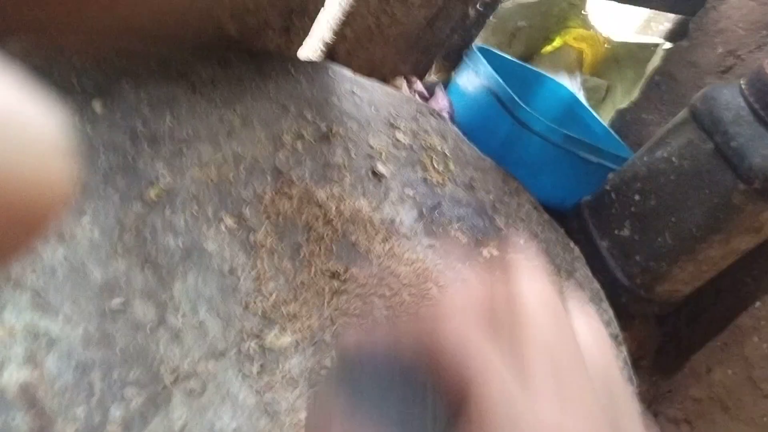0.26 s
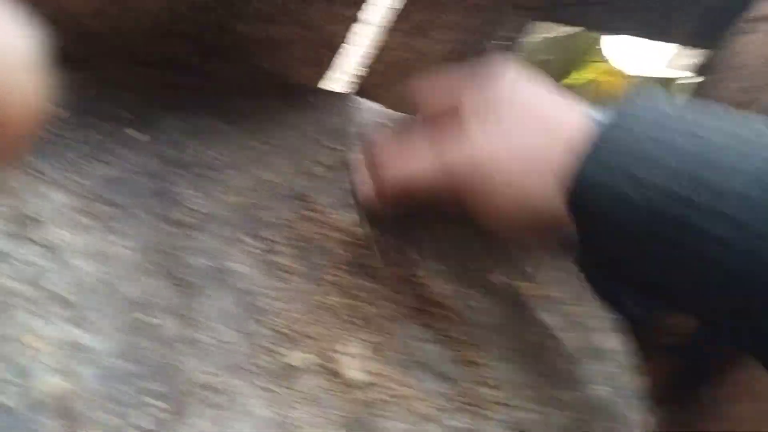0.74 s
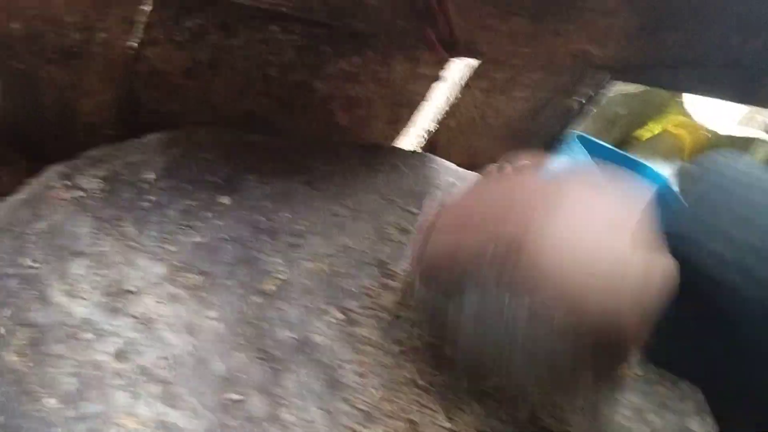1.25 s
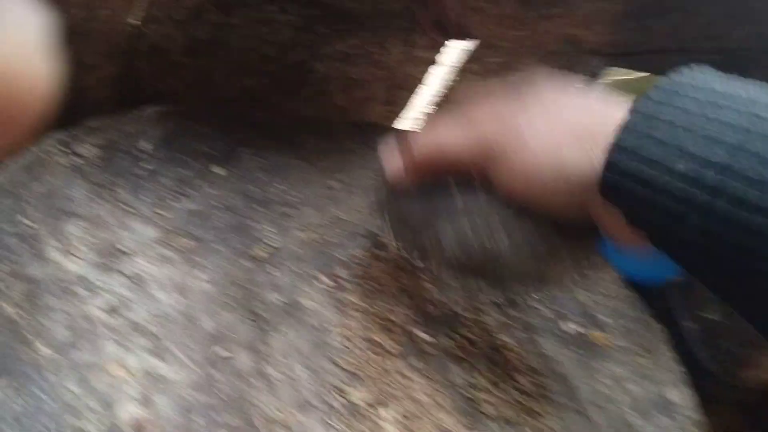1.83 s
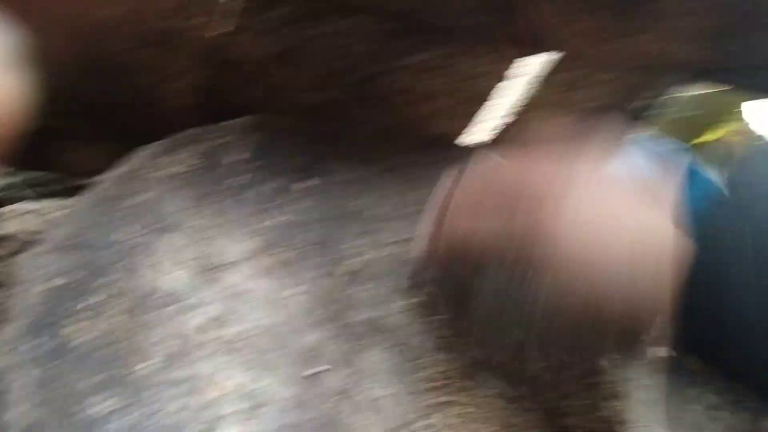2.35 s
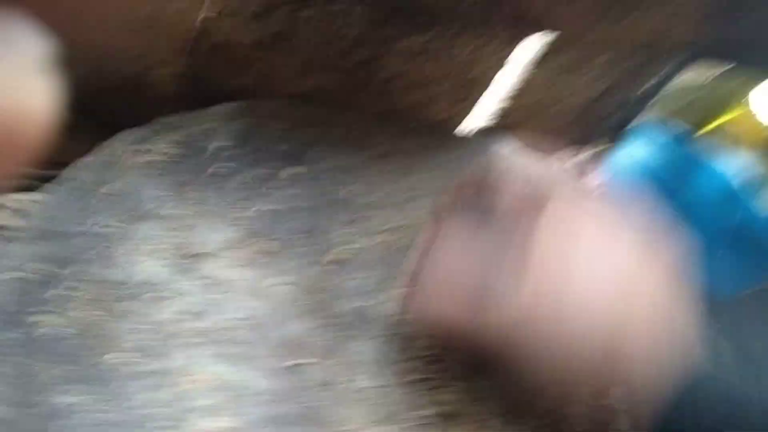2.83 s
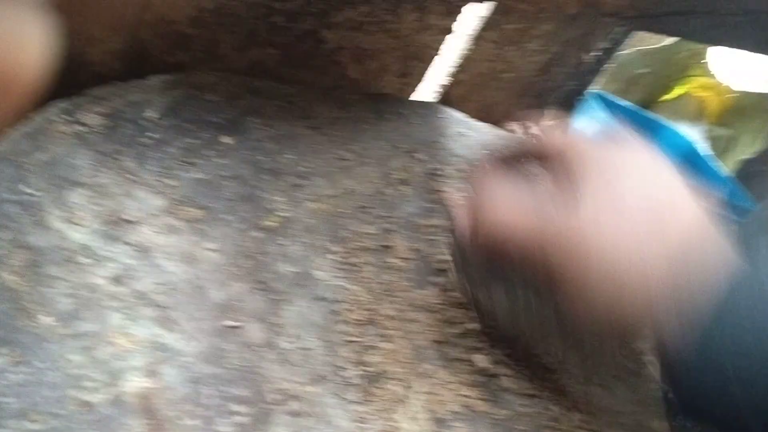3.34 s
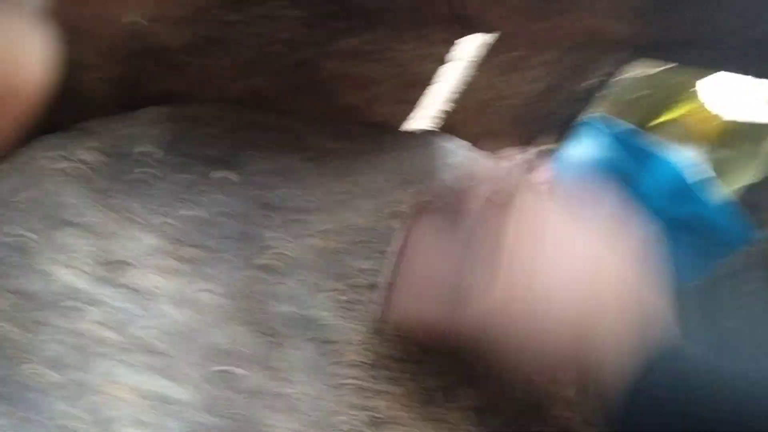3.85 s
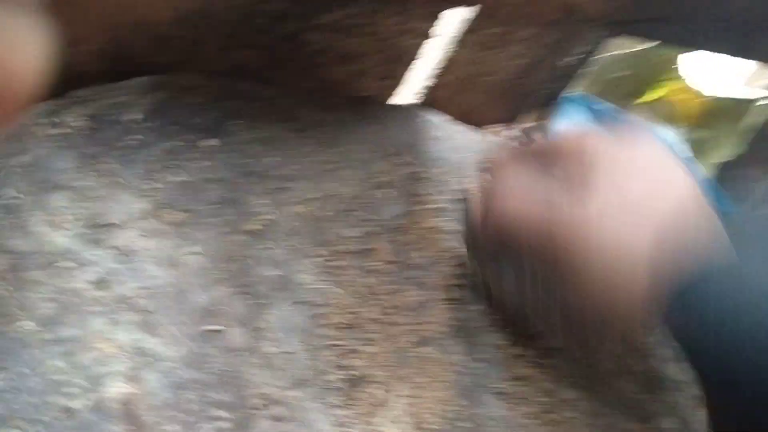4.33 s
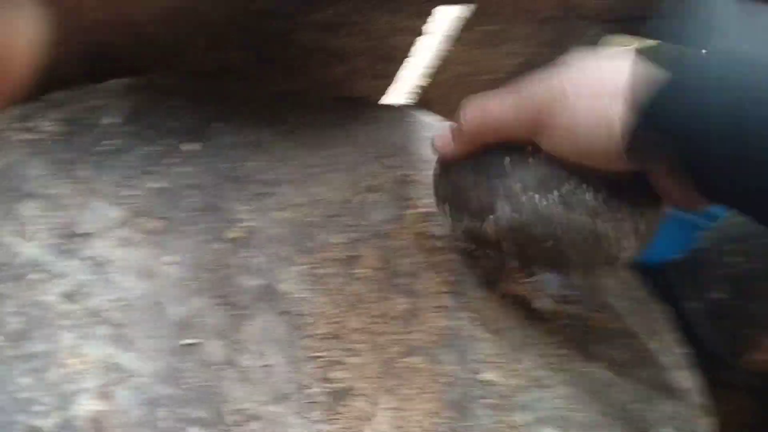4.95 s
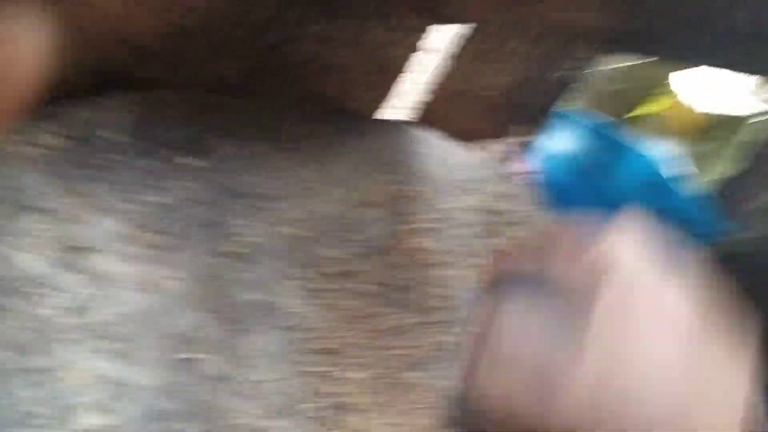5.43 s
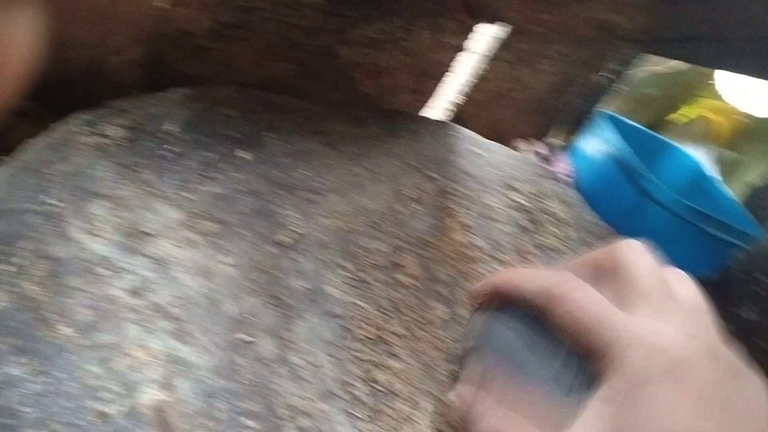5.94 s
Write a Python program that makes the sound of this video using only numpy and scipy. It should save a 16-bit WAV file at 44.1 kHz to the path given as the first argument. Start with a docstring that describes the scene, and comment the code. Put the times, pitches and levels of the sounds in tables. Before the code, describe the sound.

A hand stone is pushed back and forth over damp spice on a heavy stone slab. The short, uneven strokes make a gritty grinding with a crumbly hiss and a low rumble underneath. Stone knocks on stone at irregular moments, some as light taps and others as sharper clacks with a brief ring. It is heard from close by in a small, quiet kitchen.

```python
"""A hand stone grinds damp spice on a stone slab, heard from close by in a small kitchen.
Friction drives the sound: in each short stroke, breaking grit excites the damped modes of both stones
and dragged crumbs hiss. Impacts of stone on slab add knocks, duller when the contact is softer.
The heavy slab rumbles on its seat, and near walls reflect the strokes and knocks over a faint noise."""
import sys
import numpy as np
from scipy import signal
from scipy.fft import rfft, irfft, next_fast_len
from scipy.io import wavfile
from scipy.ndimage import uniform_filter1d, map_coordinates

SR = 44100
rng = np.random.default_rng(int(sys.argv[2]) if len(sys.argv) > 2 else 0)


def dump_mix(stems):
    """Bounce the given channels to the path in sys.argv[1] as a 16-bit WAV at rate SR."""
    frames = np.atleast_2d(stems).T  # one column per channel
    limited = np.clip(frames, -1, 1)  # hard clip at full scale
    pcm = np.round(limited * 32767).astype(np.int16)
    wavfile.write(sys.argv[1], SR, pcm)


N = 272566

# impacts of stone on slab: start_s, level_db, hardness_hz, thud_db, ring_db, ring_hz
KNOCKS = [(0.161, -36.5, 1300, -9, -3, 1152), (0.3672, -45, 1520, 9, 6, 1200),
          (0.4203, -36.5, 1480, -9, -15, 1220), (0.6759, -38.5, 900, 30, 6, 1096),
          (1.0067, -17, 890, -8.5, -3, 1048), (1.096, -41, 1700, 0.5, 5, 1120),
          (1.1208, -39.5, 1970, 11, -11, 1070), (1.312, -41.5, 800, 15, -3, 1097),
          (1.5055, -33, 1190, 5, 16.5, 1135), (1.7632, -35.5, 1270, 3, 7.5, 1124),
          (1.811, -47, 1490, -6, 20.5, 1190), (1.965, -53.5, 3260, -9, -12.5, 1180),
          (2.1071, -16.5, 930, 2, 8, 1060), (2.1859, -26.5, 1425, 3, 2, 1070),
          (2.2016, -20, 1820, 6, 5.5, 1055), (3.4854, -22, 710, 6, 13, 1075),
          (3.9114, -21.5, 1406, 1.5, 10, 1025), (4.1834, -30, 1490, 1, 8, 1178),
          (4.2621, -38.5, 2150, 4.5, 7, 1084), (4.4746, -17, 877, -6, -6.5, 1050),
          (5.01, -26.5, 1400.0, 10.5, 9, 1087), (5.2017, -16, 730, -0.5, 1.5, 1060),
          (5.2982, -31.5, 340, 20, -4, 1085), (5.378, -43, 1050, 0.5, 5, 1059),
          (5.9192, -16, 1670, -11.5, -15.5, 930)]
# modes of the slab: pitch_hz, width_hz, level_db
SLAB_MODES = [(396, 312, -0.5), (499, 212.4, 3.5)]
HISSES, GRINDS, SCRAPES, RUMBLES = range(4)  # the level columns of a stroke


def grinding():
    """Forced vibration: grit breaks in bunches, and the same force drives the modes of both stones."""
    # modes of the hand stone: pitch_hz, width_hz, level_db
    stone_modes = [(1104, 36, 7.5), (1354, 190, -7.5), (2390, 410, -15.5)]
    # a looser grip lets the hand stone ring: time_s, ring_db
    grip = [(.5, 0.5), (.8, 4.5), (1.1, 3), (1.55, 2), (2.0, 3.5), (2.6, 0), (3.0, -2), (3.65, 1),
            (4.0, -7), (4.25, -1), (4.6, -3.5), (5.0, -4.5), (5.4, 0), (5.75, 0.5), (6.18, -9.5)]
    force = grit(rate_hz=570, spread_db=1.5) * amp(2.5 * wobble(70))
    slab = unit(filtered(force, lambda hz: resonate(SLAB_MODES, hz) * band(hz, 120, 460, steep=2.2)))
    slab = steadied(slab, span_s=0.036, share=0.98)
    stone = unit(filtered(force, lambda hz: resonate(stone_modes, hz) * band(hz, 850, 4000, steep=2.9)))
    stone = level(grip) * amp(-0.5) * steadied(stone, span_s=0.063, share=0.9)
    crumbs = amp(-20.5) * unit(filtered(force, lambda hz: band(hz, 170, 1500, steep=1.9)))
    envelope = bite(strokes(GRINDS, dip_db=23.5), span_s=0.0079, share=0.22)
    return amp(-1.37) * envelope * steadied(slab + stone + crumbs, span_s=0.08, share=0.58)


def spice():
    """Friction noise: dragged crumbs merge into a clumpy hiss, with single husks snapping."""
    # spectrum of the hiss: frequency_hz, density_db
    spectrum = [(300, -33.5), (1500, -6.5), (2800, -4), (3600, -3.5), (4400, 0.5), (5300, -1), (7000, 0),
                (8700, 2), (11500, -0.5), (13500, -4), (15800, -7.5)]
    clumps = amp(0.31 * wobble(170) + 2.0 * wobble(45))
    husks = amp(-14) * grit(rate_hz=230, spread_db=-4.0)
    sides = [clumps * grit(rate_hz=16000, spread_db=5) + husks for _ in range(2)]
    for i in range(2):  # the hand and the slab each send back a copy
        sides[i] = reflection(sides[i], delay_s=0.000702, swing=0.093, gain=0.52)
        sides[i] = reflection(sides[i], delay_s=0.002, swing=.04, gain=0.84)
    hiss = unit(filtered(np.array(sides), lambda hz: amp(along(spectrum, hz))))
    # a faster stroke is brighter as well as louder
    speed = bite(strokes(HISSES, dip_db=17), span_s=0.0086, share=0.11)
    treble = filtered(hiss, lambda hz: band(hz, 4900, SR, steep=0.67))
    return amp(1.2) * speed * (hiss + treble * (unit(speed) ** 0.084 - 1))


def skimming():
    """Resonance: light sliding excites the upper modes of the hand stone."""
    # upper modes: pitch_hz, width_hz, level_db
    modes = [(1793, 70, -1), (2255, 50, -5), (2797, 71, -12.5), (3480, 50, -14)]
    force = grit(rate_hz=2500, spread_db=5.0)
    scrape = filtered(force, lambda hz: resonate(modes, hz) * band(hz, 1700, 3000, steep=1.9))
    return amp(-2.0) * strokes(SCRAPES, dip_db=19) * steadied(scrape, span_s=0.09, share=0.23)


def strokes(column, dip_db, lag_s=0):
    """Incoherent powers add: the gain of all strokes, each dip_db below its peak at the turns."""
    # pushes and pulls: fastest_s, rise_s, fall_s, pressure_lag_s, hiss_db, grind_db, scrape_db, rumble_db
    movements = [(0.07, 0.096, 0.092, 0.023, -55.5, -50.0, -58.5, -49),
                 (0.187, 0.037, 0.092, -0.011, -49.5, -41.5, -49.5, -53.5),
                 (0.333, 0.051, 0.108, -0.0021, -57.5, -60, -56, -56),
                 (0.391, 0.017, 0.11, -0.017, -61.5, -45, -55, -43),
                 (0.507, 0.05, 0.089, -0.024, -51.0, -39.5, -52, -50),
                 (0.66, 0.072, 0.1, -0.0089, -58, -57, -57.5, -58.0),
                 (0.686, 0.012, 0.037, -0.004, -66.5, -40.5, -65, -45.5),
                 (0.773, 0.026, 0.078, -0.01, -64, -48.5, -66, -53.5),
                 (1.112, 0.034, 0.042, -0.0035, -53.5, -36.5, -42, -53.0),
                 (1.172, 0.078, 0.035, 0.0068, -45, -55.5, -54.5, -53.5),
                 (1.261, 0.043, 0.1, 0.01, -50.5, -51, -53.5, -56.5),
                 (1.415, 0.041, 0.024, 0.004, -69, -50, -52.5, -65),
                 (1.469, 0.043, 0.056, 0.0033, -54, -54.5, -53, -49.5),
                 (1.563, 0.031, 0.084, -0.019, -49.5, -45, -52.5, -50),
                 (1.718, 0.11, 0.087, 0.036, -55.5, -58.5, -56.5, -53),
                 (1.84, 0.025, 0.09, -0.024, -53.5, -45, -54, -50),
                 (2.124, 0.13, 0.11, 0.045, -71, -55, -49, -56.0),
                 (2.238, 0.059, 0.065, 0.011, -48.5, -56, -50.5, -53.5),
                 (2.372, 0.068, 0.053, 0.0033, -48, -49, -51.0, -56.5),
                 (2.472, 0.043, 0.069, 0.014, -67, -52.5, -54, -72.5),
                 (2.532, 0.023, 0.131, 0.0032, -53, -57, -53.5, -59.5),
                 (2.672, 0.074, 0.073, 0.007, -50.0, -50.5, -46, -54.0),
                 (2.853, 0.088, 0.053, 0.014, -54, -53.0, -56, -50.5),
                 (2.961, 0.039, 0.071, 0.0015, -48, -46, -49, -55.5),
                 (3.09, 0.031, 0.03, 0.0, -61, -66.0, -51, -75.0),
                 (3.138, 0.094, 0.048, 0.0095, -56.5, -53, -62, -53.5),
                 (3.243, 0.052, 0.059, 0.0039, -56.5, -48, -58.0, -55.0),
                 (3.291, 0.042, 0.096, -0.045, -68.0, -67, -59.5, -54),
                 (3.566, 0.067, 0.148, -0.014, -56, -51, -59, -49.5),
                 (3.686, 0.036, 0.083, -0.016, -49.5, -47.5, -56.0, -54.5),
                 (3.876, 0.083, 0.067, 0.027, -57.5, -54.5, -60.5, -55.5),
                 (3.992, 0.069, 0.073, -0.00087, -53.5, -43, -49.5, -67),
                 (4.167, 0.079, 0.048, 0.0054, -56.5, -46.5, -54, -57.0),
                 (4.249, 0.049, 0.084, -0.0097, -62.5, -46, -58, -54.5),
                 (4.573, 0.071, 0.046, -0.0073, -53, -42.5, -58.5, -46),
                 (4.704, 0.104, 0.048, -0.004, -52, -43.5, -62.5, -61),
                 (4.871, 0.1, 0.031, 0.0084, -56.5, -47.5, -59, -52.5),
                 (4.975, 0.075, 0.11, 0.00098, -57.5, -43.5, -53.5, -56),
                 (5.237, 0.043, 0.059, 0.00014, -55, -43.5, -64, -47),
                 (5.293, 0.032, 0.073, -0.0022, -55.5, -43, -63, -49.5),
                 (5.449, 0.078, 0.071, -0.021, -54, -42.0, -60.5, -58),
                 (5.613, 0.1, 0.038, 0.00072, -57, -46.5, -61, -51.0),
                 (5.746, 0.11, 0.052, -0.017, -65, -55, -86, -58.5),
                 (6.025, 0.024, 0.096, -0.0034, -55.5, -57, -78, -49),
                 (6.174, 0.055, 0.052, -0.023, -56, -55, -74.5, -62)]
    creep_db = -81  # the stone is never quite still
    t, power = np.arange(N) / SR - lag_s, np.full(N, amp(creep_db) ** 2)
    for fastest_s, rise_s, fall_s, pressure_lag_s, *levels_db in movements:
        # the low sounds follow pressure, the high ones speed
        peak_s = fastest_s + (pressure_lag_s if column in (GRINDS, RUMBLES) else 0)
        near = slice(*np.searchsorted(t, [peak_s - 2 * rise_s, peak_s + 2 * fall_s]))
        off_peak = np.maximum((peak_s - t[near]) / rise_s, (t[near] - peak_s) / fall_s)
        power[near] += amp(levels_db[column] - dip_db * off_peak ** 2) ** 2
    return np.sqrt(power)


def bite(gain, span_s, share):
    """Static friction: the stone grips before it slides, so a rising gain gets an extra push."""
    before = np.interp(np.arange(N) - span_s * SR, np.arange(N), gain)
    return gain * np.clip(gain / before, 1, 10) ** share


def grit(rate_hz, spread_db):
    """Shot noise: tiny fractures give impulses of random time, size and sign."""
    size = amp(spread_db * np.minimum(rng.exponential(size=N), 5))
    return unit((rng.random(N) < rate_hz / SR) * size * rng.choice([-1, 1], N))


def steadied(x, span_s, share):
    """Compression: a loaded contact evens out its own swells; the result has unit rms."""
    power = x ** 2
    for _ in range(2):
        power = np.abs(uniform_filter1d(power, max(int(span_s * SR), 2)))
    return unit(x / (power + 1e-4 * power.mean()) ** (np.clip(share, 0, 1) / 2))


def knocks():
    """Impact: a short push excites both stones; a softer contact lasts longer and sounds duller."""
    # heavily damped modes of the clack: pitch_hz, width_hz, level_db
    clack_modes = [(986, 200, -9), (1480, 230, -11), (2420, 340, -4.5)]
    # ringing modes of the hand stone: pitch_hz, width_hz, level_db
    ring_modes = [(1100, 36.4, 6), (1804, 100, -0.5), (2236, 26, -3.5)]
    free_hz, width_hz, lowest_db = ring_modes[0]
    out, size, lead = np.zeros(N + SR), SR // 2, SR // 50
    hz, t = np.fft.rfftfreq(size, 1 / SR), (np.arange(size) - lead) / SR
    attack = (t > -.001) & (t < .004)
    # however hard the blow, the modes radiate only between these edges
    reach = np.abs(slope(hz, 2940, "low", order=7)) * slope(hz, 270, "high", order=2)
    thud, clack = resonate(SLAB_MODES, hz), resonate(clack_modes, hz)
    for start_s, level_db, hardness_hz, thud_db, ring_db, ring_hz in KNOCKS:
        # spice is crushed just before and after the stones touch
        crush = amp(-36) * rng.standard_normal(size) * np.exp(-np.abs(t - .002) / 0.0029)
        # a tight hold shifts the lowest ring and damps it
        damping = 1 + 16 * abs(ring_hz / free_hz - 1)
        lowest = (ring_hz, width_hz * damping, lowest_db - 10 * np.log10(damping))
        # a harder contact wakes the upper rings, 9 dB per octave of hardness
        upper_db = 9 * np.log2(hardness_hz / 1400)
        upper = [(pitch, width, db + upper_db) for pitch, width, db in ring_modes[1:]]
        body = amp(thud_db) * thud + clack + amp(ring_db) * resonate([lowest] + upper, hz)
        push = np.abs(slope(hz, hardness_hz, "low", order=3))
        blow = irfft(rfft((t == 0) + crush) * body * push * reach, size)
        blow /= np.sqrt(np.mean(blow[attack] ** 2))
        # only hard, bare contacts crack in the treble
        burst = rng.standard_normal(size) * (t >= 0) * np.exp(-np.abs(t) / 0.0027)
        crack = irfft(rfft(burst) * band(hz, 2500, 3300, steep=2.0), size)
        crack *= amp(-6) * (hardness_hz / 2000) ** 2.4
        out[round(start_s * SR) - lead:][:size] += amp(level_db) * (blow + crack)
    return out[:N]


def rumble():
    """Mass on a spring: bumps bounce the heavy slab on its seat, and it follows the hand late."""
    # modes of the slab on its seat: pitch_hz, width_hz, level_db
    modes = [(106.4, 20.3, 1.5), (174, 68, -12.5), (165, 13, -24.5), (273, 78, -17.5)]
    bumps = grit(rate_hz=500, spread_db=1.0)
    bounce = filtered(bumps, lambda hz: resonate(modes, hz) * band(hz, 72, 500, steep=4.6))
    shake = np.hypot(strokes(RUMBLES, dip_db=14.5, lag_s=.018), jolts())
    return amp(1.5) * shake * steadied(bounce, span_s=0.2, share=0.99)


def jolts():
    """Transient response: the gain of the slab's shudder rises and decays after each knock."""
    rise_s, decay_s = 0.0022, 0.021
    gain, t = np.zeros(N + SR), np.arange(SR // 2) / SR
    shudder = (1 - np.exp(-t / rise_s)) * np.exp(-t / decay_s)
    for start_s, level_db, _, thud_db, *_ in KNOCKS:
        gain[round(start_s * SR):][:len(t)] += amp(level_db - 25 + 0.49 * thud_db) * shudder
    return gain[:N]


def radiate(x):
    """Directivity: each resonance reaches left and right with its own level and phase."""
    # left relative to right: frequency_hz, level_db, lead_rad
    directivity = [(150, -1, 1.5), (476, 2.5, -0.76), (730, 8.5, 1), (930, 4, -2), (1216, -9, -2),
                   (1400, 7, 0.47), (1830, -4, -1.63), (2240, -4.5, 1.5), (3570, -2, -1), (7000, 3, 2),
                   (8800, -1.5, 0.5), (10900, 4, -9), (14500, 11.5, -6)]
    side, lean = np.array([[.5], [-.5]]), np.array(directivity)

    def response(hz):
        gain = amp(side * along(lean[:, :2], hz))
        phase = side * along(lean[:, ::2], hz)
        return gain / np.sqrt(np.mean(gain ** 2, axis=0)) * np.exp(1j * phase)
    return filtered(x, response)


def reflection(x, delay_s, swing, gain):
    """Comb filtering: a near surface adds a copy whose delay swings with the arm."""
    delay = SR * delay_s * (1 + swing * wobble(2.5))
    return x + gain * map_coordinates(x, [np.arange(N) - delay], order=3)


def kitchen(x):
    """Diffuse reverberation: walls and floor return bass alike on both sides, treble uncorrelated."""
    # reverberation time: frequency_hz, t60_s
    decay = [(120, 0.2833), (450, 0.1777), (1100, 0.2325), (3000, 0.09), (10000, 4)]
    # colour of the reflections: frequency_hz, level_db
    colour = [(60, -9.5), (130, 20), (200, 4.5), (290, -6), (520, 2), (850, -2.5), (1300, -4), (2500, 3),
              (5000, -7), (12000, -22)]
    hz, t, noise = signal.stft(rng.standard_normal((2, SR // 3)), SR, nperseg=256)
    tail_db = along(colour, hz)[:, None] - 60 * t / along(decay, hz)[:, None]
    mid, side = noise * amp(tail_db) * (1 - np.exp(-t / 0.00059))
    apart = (hz ** 2 / (hz ** 2 + 750 ** 2))[:, None]
    spectra = np.array([mid + apart * side, mid - apart * side]) / np.sqrt(1 + apart ** 2)
    tail = signal.istft(spectra, SR, nperseg=256)[1]
    return signal.fftconvolve(x, tail / np.sqrt(SR / 100), axes=1)[:, :N]


def reverberation(x):
    """Reverberation: eight random tails of the same room crossfade, so no single colouring persists."""
    moments, t = np.linspace(0, N / SR, num=8), np.arange(N) / SR
    return sum(kitchen(x * np.sqrt(np.interp(t, moments, share))) for share in np.eye(len(moments)))


def background():
    """Stationary noise, strongest in the bass and independent on each side."""
    # noise floor: frequency_hz, density_db
    spectrum = [(25, -15.5), (60, -6), (130, 0), (450, -10), (900, -8), (2000, -11), (5000, -14.5),
                (15800, -33)]
    return unit(filtered(rng.standard_normal((2, N)), lambda hz: amp(along(spectrum, hz))))


def amp(db):
    """Decibels as an amplitude ratio."""
    return 10 ** (np.asarray(db) / 20)


def unit(x):
    """Normalisation to unit rms."""
    return x / np.sqrt(np.mean(x ** 2) + 1e-20)


def along(points, hz):
    """Interpolation of (frequency_hz, value) points on a log axis."""
    knots_hz, values = np.transpose(points)
    return np.interp(np.log(hz + 1), np.log(knots_hz + 1), values)


def level(rows):
    """Interpolation of (time_s, level_db) points into a gain for each sample."""
    return amp(np.interp(np.arange(N) / SR, *np.transpose(rows)))


def wobble(rate_hz):
    """Random modulation: a smooth curve through rate_hz knots a second."""
    return map_coordinates(rng.standard_normal(int(N * rate_hz / SR) + 4), [np.arange(N) * rate_hz / SR])


def filtered(x, response):
    """Linear filtering: the spectrum of x times a frequency response."""
    size = next_fast_len(N + SR // 2)
    return irfft(rfft(x, size) * response(np.fft.rfftfreq(size, 1 / SR)), size)[..., :N]


def resonate(modes, hz):
    """Modal superposition: damped resonances add with alternating signs."""
    return sum((-1) ** k * amp(db) * 1j * hz * width / (pitch ** 2 - hz ** 2 + 1j * hz * width)
               for k, (pitch, width, db) in enumerate(modes))


def band(hz, low_hz, high_hz, steep):
    """Band-pass gain with skirts of about 6 * steep dB per octave."""
    return 1 / np.sqrt((1 + (low_hz / (hz + 1)) ** (2 * steep)) * (1 + (hz / high_hz) ** (2 * steep)))


def slope(hz, edge_hz, kind, order):
    """A causal high-pass or low-pass response."""
    return signal.freqs(*signal.butter(order, edge_hz, kind, analog=True), hz)[1]


def scene():
    """Superposition of the direct sound, its reverberation and a faint background."""
    blows = radiate(knocks())
    rubbing = radiate(grinding() + skimming() + spice())
    quiet = amp(-69.0) * background()
    direct = blows + rubbing + rumble()
    return direct + reverberation(amp(-11) * blows + amp(-18.0) * rubbing) + quiet


def record(dry):
    """Band limiting: an ideal low-pass removes the highest treble."""
    top_hz = 15830
    return filtered(dry, lambda hz: hz < top_hz)


dry = scene()
out = record(dry)
dump_mix(out)
```